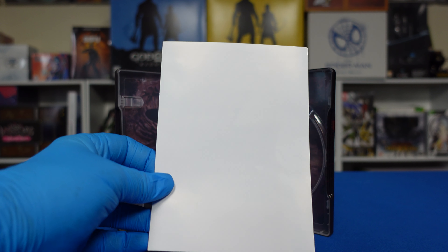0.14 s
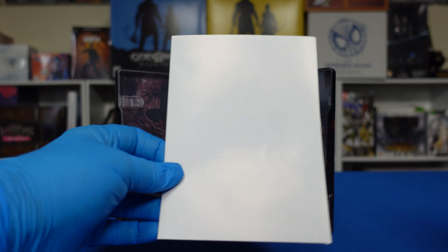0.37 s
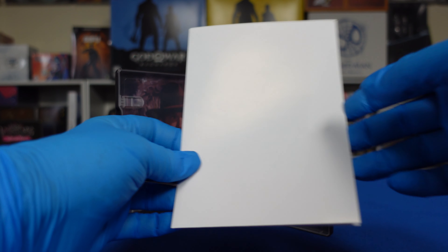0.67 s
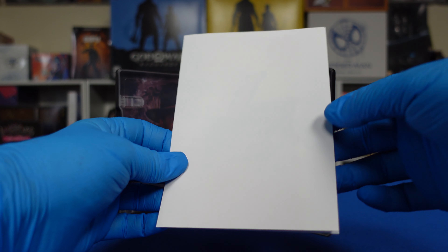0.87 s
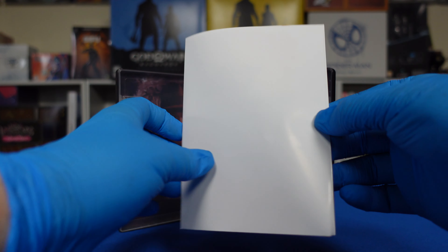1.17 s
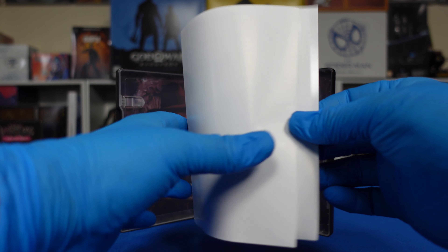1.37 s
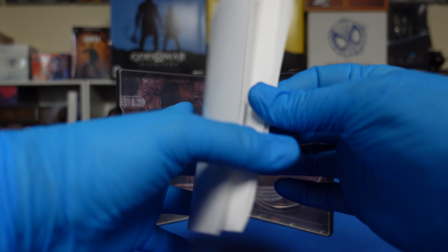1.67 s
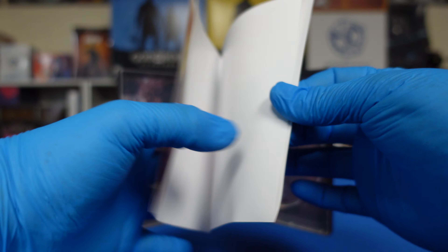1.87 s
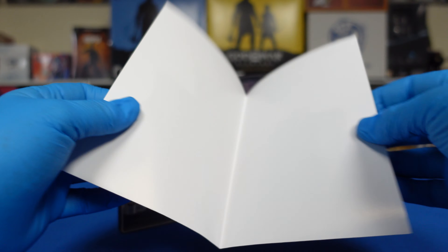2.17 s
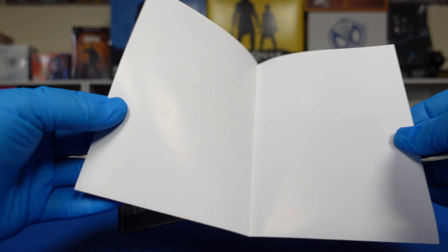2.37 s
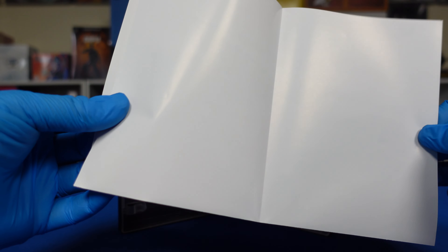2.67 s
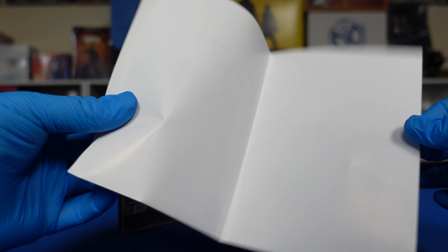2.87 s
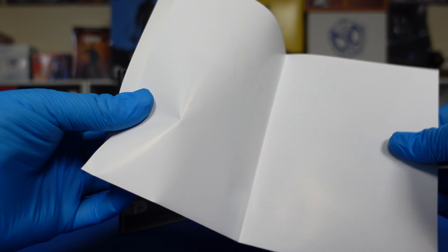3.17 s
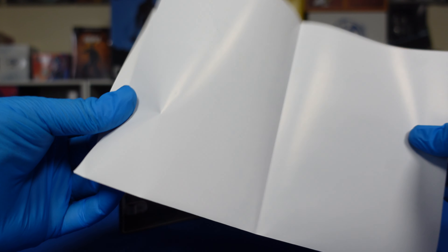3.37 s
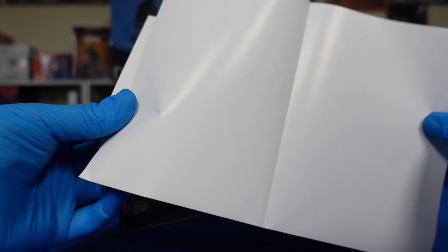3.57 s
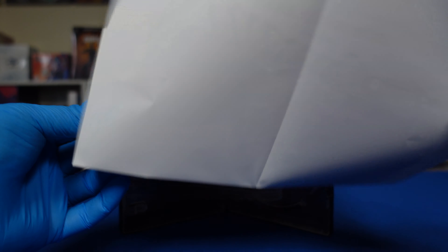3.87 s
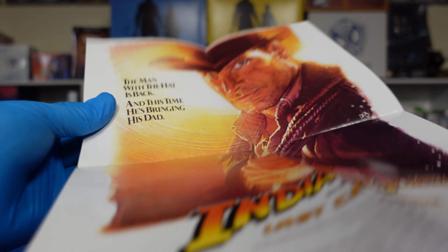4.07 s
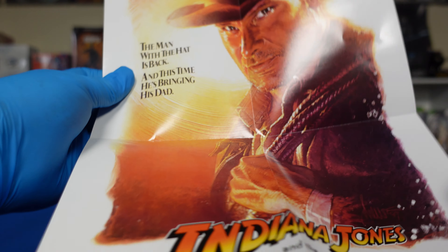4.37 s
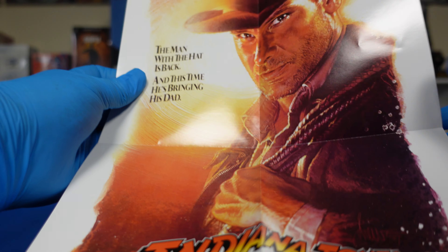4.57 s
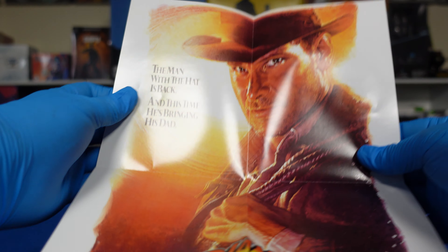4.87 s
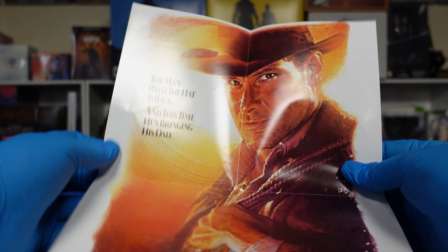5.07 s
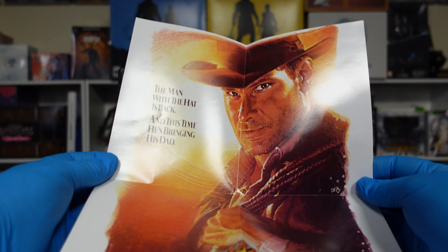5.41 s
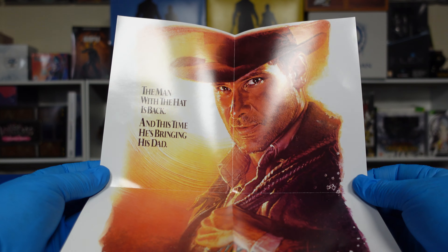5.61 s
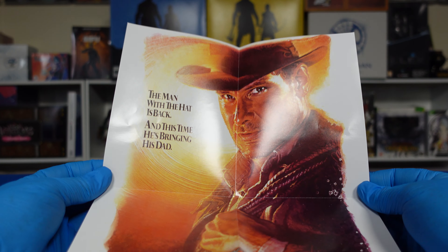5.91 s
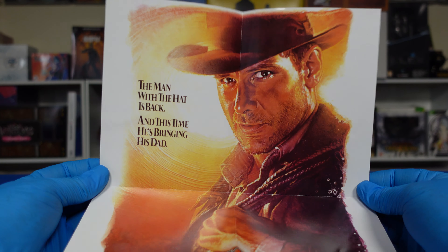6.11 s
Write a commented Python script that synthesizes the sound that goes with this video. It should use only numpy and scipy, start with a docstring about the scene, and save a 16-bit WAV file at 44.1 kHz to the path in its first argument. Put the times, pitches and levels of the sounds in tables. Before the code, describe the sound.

Close to the microphone in a small quiet room, gloved fingers slide softly over a folded glossy sheet. Short rasps, squeaks and crisp ticks follow as it opens. A stuck fold stutters free, then rustling swells to a loud crackling rush with hard crease snaps. Panels buckle with brief hollow pops, and lighter strokes and ticks finish over faint steady room noise.

```python
"""Gloved hands unfold a glossy paper poster close to a microphone in a small, quiet room.
It starts with faint sliding (grit and hiss driving the sheet) and a thin rising whistle (sine harmonics).
Short rasps and squeaks follow (stick-slip noise and tones), then a stuck fold stutters loose in slip runs.
Creases tick hard (chirped pulses) as the sliding peaks, then panels buckle with hollow pops (short rings).
Softer strokes, ticks and pops close the scene; steady room noise lies under all of it."""
import sys
import numpy as np
from scipy import signal
from scipy.fft import rfft, irfft, next_fast_len
from scipy.io import wavfile
from scipy.ndimage import uniform_filter1d, map_coordinates

SR = 44100
rng = np.random.default_rng(int(sys.argv[2]) if len(sys.argv) > 2 else 0)


def store_pcm(level_fs):
    """Save levels as 16-bit WAV."""
    pcm = np.round(np.clip(level_fs, -1, 1) * 32767).astype(np.int16)
    wavfile.write(sys.argv[1], SR, np.atleast_2d(pcm).T)


N = 275524
TIME = np.arange(N) / SR


def amp(db):
    """Decibels to gain."""
    return 10 ** (np.asarray(db) / 20)


def unit(x):
    """Scales to rms 1."""
    return x / np.sqrt(np.mean(x ** 2) + 1e-20)


def read(points, hz):
    """Interpolates a spectrum on a log-frequency axis."""
    point_hz, value = np.transpose(points)
    return np.interp(np.log(hz + 1), np.log(point_hz + 1), value)


def curves(rows):
    """Interpolates each column of a table over time."""
    s, *columns = np.transpose(rows)
    return [np.interp(TIME, s, column) for column in columns]


def add(mix, s, sound):
    """Mixes a sound in at s seconds, or at 0 if s is negative."""
    part = mix[max(round(s * SR), 0):][:len(sound)]
    part += sound[:len(part)]


def high_pass(x, hz):
    """Second-order low cut at hz."""
    return signal.sosfilt(signal.butter(2, hz, "high", fs=SR, output="sos"), x)


def colour(x, gain):
    """Minimum-phase filter whose magnitude is gain(Hz)."""
    size = 4096
    log_gain = np.log(np.maximum(gain(abs(np.fft.fftfreq(size, 1 / SR))), 1e-5))
    spectrum = np.exp(np.conj(signal.hilbert(log_gain)))
    taps = np.fft.ifft(spectrum).real[:size // 2]
    return signal.oaconvolve(x, taps)[:len(x)]


def wander(size, hz):
    """Smooth noise of rms 1; its spectrum falls to 1/e at hz."""
    f = np.fft.rfftfreq(next_fast_len(size + 4096), 1 / SR)
    noise = rng.standard_normal(len(f)) + 1j * rng.standard_normal(len(f))
    return unit(irfft(noise * np.exp(-(f / hz) ** 2))[:size])


def snap(hz, cycles=0.54, sweep=1.654):
    """A tiny flexural pulse: short waves run faster through paper, so it chirps downwards."""
    turns = np.arange(400) * hz / SR
    age = turns / cycles
    phase = 0.7 * turns + sweep * (1 - np.exp(-age)) + rng.random()
    pulse = age * np.exp(-age) * np.sin(2 * np.pi * phase)
    return pulse / abs(pulse).max()


def grit(per_s, spread_db, count=12):
    """A hail of fibre snaps of many pitches and uneven size, whitened and evened in level."""
    size = amp(spread_db * np.minimum(rng.exponential(1, N), 3.8)) * (rng.random(N) < per_s / SR)
    signed_size = size * rng.choice([-1, 1], N)
    kind = rng.integers(0, count, N)
    shapes = [unit(snap(hz)) * np.sqrt(hz) for hz in np.geomspace(1200, 8000, count)]
    hail = np.zeros(N)
    for k, shape in enumerate(shapes):
        hail += signal.oaconvolve(signed_size * (kind == k), shape)[:N]
    mean_gain = np.sqrt(sum(abs(rfft(shape)) ** 2 for shape in shapes))
    gain_hz = np.linspace(0, SR / 2, len(mean_gain))
    hail = colour(hail, lambda f: mean_gain.max() / np.interp(f, gain_hz, mean_gain))
    return hail / np.sqrt(abs(uniform_filter1d(hail ** 2, size=1300)) + 1e-9)


# Colour of a snapping crease. Each row: frequency in Hz, gain in dB.
CREASE_COLOUR = [(100, -26.5), (400, -2), (900, -4), (2500, -2.5), (6000, 1), (8000, 1.5), (15000, 1.5)]


def crease_colour(x):
    """Filters snaps to the spectrum of a crease."""
    return colour(x, lambda f: amp(read(CREASE_COLOUR, f)))


# One leaf or finger slides over the paper. Each row: start in s, rise in s, fall in s, rustle in dB,
# panel flutter in dB over rustle, edge hiss in dB over rustle, share of crackle 0-1.
STROKES = [(0, 0.16, .02, -50, -0.5, 4.5, 0.14), (.675, 0.039, 0.0096, -44.5, 0.5, 6.5, 0.24),
           (.9, 0.0065, 0.089, -51, -0.5, 7.5, 0.6), (1.04, 0.22, 0.033, -47, -1.5, 6.5, 0.2),
           (1.125, .023, 0.02, -40.5, -5, 11.5, 0.9), (1.183, 0.24, 0.073, -29, -14.5, 5, 0.54),
           (1.5, 0.025, .11, -34.5, -3, -4, 0.73), (1.618, 0.13, 0.018, -29.5, -14.5, -2.5, 0.6),
           (1.858, 0.056, 0.029, -35, -22, 2.5, 0.43), (1.95, 0.071, 0.078, -35, 0, 0.5, 0.65),
           (2.1, 0.042, 0.15, -39.5, 0, -2, 0.26), (2.344, 0.13, 0.16, -27, 0, -4.5, 0.56),
           (2.5, .08, 0.19, -27.5, -7, -1, 0.8), (2.66, 0.19, 0.13, -28.5, -7, 4.5, .75),
           (3.159, 0.17, 0.046, -21.5, -4, -6, 0.96), (3.341, 0.082, 0.074, -25.5, -3.5, -0.5, 0.77),
           (3.479, 0.1, 0.29, -23.5, -7, -3.5, 0.68), (3.689, 0.039, 0.11, -17, -8, -8.5, 0.32),
           (3.859, 0.13, 0.06, -16.5, -7.5, -6.5, 0), (4.041, 0.097, 0.13, -25, -13, -7, 0),
           (4.233, 0.11, 0.086, -23, -5.5, -4.5, 0.64), (4.48, 0.036, 0.15, -33, -5.5, -7.5, .98),
           (4.763, 0.043, 0.12, -32, 0.5, -3.5, 0.62), (4.949, .07, 0.13, -40, -3, 0.5, 0.17),
           (5.125, 0.075, 0.055, -32.5, -2, 0.5, 0.05), (5.282, 0.016, 0.12, -33.5, -3, -2.5, 0.12),
           (5.379, 0.066, 0.17, -36.5, 0, 2, 0.44), (5.55, 0.012, .06, -31.5, -6, 1.5, 0.53),
           (5.625, 0.029, 0.11, -37.5, 3.5, 0, 0.82), (5.746, 0.033, .05, -33, 2, -1, 0.63),
           (5.81, 0.055, 0.18, -35, 4.5, -3, 0.76), (6.001, 0.042, .07, -32.5, -9, -4, 0.25),
           (6.16, 0.064, 0.096, -31, -7, -5, 0.33)]
# The held sheet never quite rests. Levels of panel flutter, rustle and edge hiss in dB.
HELD_DB = (-69, -67.5, -73)


def strokes(swell_db=9.5, arch_power=1.23, touch_share=0.071, release_s=0.028, held_crackle=1):
    """Arched swells of contact; returns gains of flutter, rustle and hiss, and the share of crackle."""
    power = amp(HELD_DB)[:, None] ** 2 * np.ones(N)
    crackling = held_crackle * power[1]
    for start, rise, fall, db, flutter_db, hiss_db, share in STROKES:
        age = TIME - start
        from_peak = np.interp(age, [0, rise, rise + fall], [1, 0, 1])
        touch = np.clip(age / (touch_share * rise), 0, 1)
        release = np.exp(-np.maximum(age - rise - fall, 0) / release_s)
        rustle = (touch * release * amp(db - swell_db * from_peak ** arch_power)) ** 2
        power += amp([flutter_db, 0, hiss_db])[:, None] ** 2 * rustle
        crackling += share * rustle
    return np.sqrt(power), np.clip(crackling / power[1], 0, 1)


# Colour of the sliding paper. Each row: frequency in Hz, gain in dB.
PAPER_COLOUR = [(24, -103), (40, -52), (243, -20.5), (297, -15), (372, -14.5), (516, -4), (556, -2),
                (697, 0), (1240, -6), (1720, -7), (2910, -5), (5310, -12.5), (8130, -15), (14800, -25.5),
                (16000, -20.5)]


def sliding(flutter_hz=1100, hiss_hz=4500, judder_db=1.7, patchy_db=1):
    """Grit and hiss drive the sheet; its panels, its face and its edges each radiate their own range."""
    gains, share = strokes()
    crackle = crease_colour(grit(per_s=750, spread_db=5))
    drive = np.sqrt(share) * crackle + np.sqrt(1 - share) * rng.standard_normal(N)
    drive *= amp(judder_db * wander(N, hz=69.0))
    drive = colour(drive, lambda f: amp(read(PAPER_COLOUR, f)))
    size = next_fast_len(N)
    f, spectrum = np.fft.rfftfreq(size, 1 / SR), rfft(drive, size)
    below_flutter = 1 / (1 + (f / flutter_hz) ** 6)
    below_hiss = 1 / (1 + (f / hiss_hz) ** 6)
    ranges = below_flutter, below_hiss - below_flutter, 1 - below_hiss
    out = np.zeros(N)
    for weight, gain in zip(ranges, gains):
        band = unit(irfft(spectrum * weight, size)[:N])
        out += band * gain * amp(patchy_db * wander(N, hz=30.2))
    return out


# A stuck fold lets go in runs of evenly spaced slips. Each row: start in s, end in s, period in s,
# slip length in s without edges, level in dB, first Hz, last Hz, share of squeak 0-1.
STUTTERS = [(2.883, 2.99, .0237, 0.0163, -13, 2770, 1598, 0.37),
            (3.179, 3.268, 0.027, 0.0112, -17, 1882, 2246, 0.39)]


def stutters(sag=0.74):
    """Splits runs into slips with stepped first pitches; each slip ends at sag times its own."""
    rows = []
    for start, end, period, length, db, first_hz, last_hz, share in STUTTERS:
        times = np.arange(start, end, period)
        pitches = np.geomspace(first_hz, last_hz, len(times))
        rows += [(s, length, db, hz, hz * sag, share) for s, hz in zip(times, pitches)]
    return rows


# Colour of the rasp at a mean slip rate of 2500 Hz. Each row: frequency in Hz, gain in dB.
RASP_COLOUR = [(80, -61), (300, -47), (600, 2), (1200, 0.5), (2500, 8), (5000, 5), (9000, -3.5),
               (12000, -7), (16000, -12)]


def rasp(drive, mean_hz):
    """Irregular stick-slip noise; faster slips rasp brighter."""
    quickness = (mean_hz / 2500) ** 0.46
    return unit(colour(drive, lambda f: amp(read(RASP_COLOUR, f / quickness))))


# The glossy faces stick and slip. Each row: start in s, length in s without edges, level in dB,
# first Hz, last Hz, share of squeak 0-1 (the rest is rasp).
SLIPS = [(0, 0.03, -38.5, 2485, 2800, 0.63), (.029, .09, -44.5, 3250, 3380, 0.66),
         (.121, .017, -28, 3456, 3586, 0.07), (.675, .013, -31.5, 6150, 5680, 0),
         (1.205, 0.027, -21.5, 4200, 4670, 0.63), (1.249, 0.013, -15.5, 6210, 3010, 0.7),
         (1.281, 0.014, -18, 2400, 6950, 0.86), (1.291, 0.047, -18, 6880, 10200, 0.8),
         (1.345, 0.013, -14.5, 10200, 7960, 0.51), (1.391, 0.01, -18, 3550, 4330, 0.16),
         (1.631, 0.0058, -25, 6000, 6000, 0.1), (1.742, .017, -17, 3910, 5120, .08),
         (1.929, 0.012, -19, 4110, 2110, 0.24), (2.291, 0.05, -30, 851, 704, 0.73),
         (2.622, .04, -17.5, 5280, 8070, 0.84), (2.667, 0.016, -16.5, 2404, 2040, 0.2),
         (2.692, .045, -16, 5190, 3530, 0.52), (2.736, 0.06, -14.5, 3000, 2374, .44),
         (2.791, .085, -12, 2507, 2565, 0.6), (3.369, 0.0039, -12.5, 2460, 1980, 0.86),
         (3.495, .052, -20.5, 8220, 6900, 0.63), (3.69, 0.016, -19, 4680, 2950, 0.44),
         (3.882, .007, -11.5, 5300, 4440, 0.08), (3.888, .013, -13.5, 3070, 2220, 0.5),
         (4.06, 0.057, -22.5, 5080, 4590, 0.48), (4.344, 0.016, -13.5, 4456, 3560, 0.2)]


def slips(jitter=0.2786, jitter_hz=900, overtone_db=-11, edge_s=.003, shudder_db=0.5, swell_db=3):
    """The faces catch and let go at an audible rate: a squeak when regular, a rasp when not."""
    out = np.zeros(N)
    drive = unit(grit(per_s=5700, spread_db=2.5) + 0.68 * rng.standard_normal(N))
    for start, length, db, first_hz, last_hz, share in list(SLIPS) + stutters():
        size = round((length + edge_s) * SR)
        hz = np.geomspace(first_hz, last_hz, size)
        hz *= 1 + jitter * (1 - share) * wander(size, hz=jitter_hz)
        phase = 2 * np.pi * np.cumsum(hz) / SR
        squeak = np.zeros(size)
        for k in range(3):
            below_nyquist = (k + 1) * hz < SR / 2
            squeak += amp(overtone_db * k) * np.sin((k + 1) * phase) * below_nyquist
        noise = rasp(drive[round(start * SR):][:size], np.sqrt(first_hz * last_hz))
        t = np.arange(size) / SR
        grip = np.clip(np.minimum(t, t[-1] - t) / edge_s, 0, 1)
        grip *= amp(shudder_db * wander(size, hz=150))
        grip *= amp(swell_db * (t / t[-1] - .5))  # tension builds until the faces let go
        slip = np.sqrt(share) * unit(squeak) + np.sqrt(1 - share) * noise
        add(out, start - edge_s / 2, amp(db) * grip * slip)
    return high_pass(out, hz=365)


# Crease ticks. Each row: time in s, pulse level in dB before colouring, nominal chirp pitch in Hz.
TICKS = [(0.125, -8, 4340), (1.213, -6.5, 4700), (1.374, -7, 2770), (1.473, -5.5, 3030),
         (1.956, -7.5, 5530), (1.994, -12.5, 5740), (2.47, -5.5, 2940), (2.487, -7.5, 2900),
         (3.049, -17.5, 3855), (3.084, -19, 2390), (3.101, -14, 2360), (3.307, -3.5, 2530),
         (3.402, -8, 3455), (3.414, -8.5, 2500), (3.455, -5.5, 2500), (3.461, -2, 3280),
         (3.545, -0.5, 2880), (3.571, 1.5, 3360), (3.592, -10, 3490), (3.62, -13, 3360), (3.648, -2, 3300),
         (4.301, -7, 2030), (4.428, -6, 2300), (4.451, -17, 2090), (4.483, -11.5, 2300), (4.501, -12, 2660),
         (4.565, -16, 2880), (4.578, -19, 2860), (4.623, -17, 2060), (4.741, -17, 3900),
         (5.369, -12.5, 5590), (5.403, -15, 5620), (5.756, -25, 2480), (5.772, -17, 5670),
         (5.853, -18, 3240), (5.967, -15.5, 5600)]


def ticks(fizz_db=-21, fizz_decay_s=.0012):
    """Single creases snap, each with a brief fizz of fibres."""
    out, t = np.zeros(N), np.arange(SR // 50) / SR
    fizz = np.exp(-t / fizz_decay_s)
    for s, db, hz in TICKS:
        add(out, s, amp(db) * snap(hz, cycles=0.53, sweep=0.44))
        add(out, s, amp(db + fizz_db) * fizz * rng.standard_normal(len(t)))
    return high_pass(crease_colour(out), hz=294)


# Reflections off the curling panels. Each row: nominal delay in s, gain before level correction.
PANELS = [(.00033, -.24), (.00071, .3), (.0016, -.26), (.0027, .2)]


def bending(x):
    """Panels reflect the sound; as they curl the paths change and hollow bands drift through it."""
    out = x.copy()
    for delay, gain in PANELS:
        path_s = delay * np.exp(.22 * wander(N, hz=2.5))
        out += gain * map_coordinates(x, [(TIME - path_s) * SR], order=3)
    return out / np.sqrt(1 + sum(gain ** 2 for _, gain in PANELS))


# Panels buckle through. Each row: time in s, ring level in dB before the low cut, starting pitch in Hz,
# ring time constant in s.
POPS = [(0.782, -30, 1330, 0.0013), (.846, -34.5, 1310, 0.0012), (.995, -28.5, 1060, 0.00079),
        (1.937, -18, 1330, 0.004), (2.105, -17, 1060, 0.00058), (2.67, -8.5, 1020, .0005),
        (3.101, -25.5, 1000, .001), (4.237, -14, 1180, .0014), (4.3728, -6.5, 1580, 0.0013),
        (4.3762, -3, 980, 0.00099), (4.6476, -1, 1910, 0.00081), (4.9816, -12.5, 1240, 0.00027),
        (5.185, -12.5, 1020, 0.0014), (5.654, -21, 1170, 0.0025), (5.9, -11.5, 1080, 0.00083)]


def pops(rise_s=0.000067, sag=0.047, shiver_db=-22, shiver_s=0.019):
    """A buckling panel rings briefly, sagging in pitch, and the sheet shivers after it."""
    out, t = np.zeros(N), np.arange(SR // 10) / SR
    for s, db, hz, ring_s in POPS:
        pitch_hz = hz * (1 - sag * (1 - np.exp(-t / (2 * ring_s))))
        phase = 2 * np.pi * np.cumsum(pitch_hz) / SR
        ring = (1 - np.exp(-t / rise_s)) * np.exp(-t / ring_s) * np.sin(phase)
        noise = rng.standard_normal(len(t))
        shiver = unit(colour(noise, lambda f: (f / hz) ** 2 / (1 + (f / hz) ** 5)))
        shiver *= amp(shiver_db) * np.exp(-t / shiver_s)
        add(out, s, amp(db) * (ring / abs(ring).max() + shiver))
    return high_pass(out, hz=406)


# A faint whistle. Each row: time in s, fundamental (itself silent) in Hz, level in dB.
WHISTLE = [(.25, 3040, -70), (.4, 3150, -67), (.48, 3050, -74), (.54, 3240, -63), (.615, 3600, -57),
           (.67, 3400, -61)]


def whistle(harmonics_db=(0, 0, -4)):
    """A thin tone of second to fourth harmonics that wavers and rises."""
    hz, db = curves(WHISTLE)
    phase = 2 * np.pi * np.cumsum(hz * (1 + .003 * wander(N, hz=300))) / SR
    sounding = (TIME > WHISTLE[0][0]) & (TIME < WHISTLE[-1][0])
    tone = sum(amp(h) * np.sin((k + 2) * phase) for k, h in enumerate(harmonics_db))
    return sounding * amp(db) * tone


# Echoes off the hands and the table. Each row: delay in s, gain.
ECHOES = [(.0031, 0.072), (.0067, 0.049), (0.0114, .11), (0.014, 0.04)]


def echoes(x):
    """Near surfaces return delayed, weaker copies."""
    out = np.zeros(N)
    for delay, gain in ECHOES:
        add(out, delay, gain * x)
    return out


# The room's decay. Each row: frequency in Hz, t60 in s.
ROOM = [(200, 0.19), (1500, 0.12), (5000, 0.17), (14000, 0.21)]


def room_tail(x, onset_s=.004):
    """Dense reflections as noise whose decay time depends on frequency."""
    hz, t, z = signal.stft(rng.standard_normal(SR // 3), SR, nperseg=256)
    decay = amp(-60 * t / read(ROOM, hz)[:, None])
    tail = signal.istft(z * decay * (t > onset_s), SR, nperseg=256)[1]
    return signal.oaconvolve(x, tail / np.linalg.norm(tail))[:N]


# Colour of the room's quiet background. Each row: frequency in Hz, gain in dB.
AIR_COLOUR = [(18, -64), (30, -45), (109, -16.5), (210, -10), (227, -10.5), (473, -2), (822, 1),
              (5590, -10), (6050, -5.5), (6550, -9.5), (11100, -10.5), (12600, -11), (16000, -14)]


def air(level_db=-51.5, width=0.56):
    """Steady room noise from a shared mid and a weaker side that differs in sign left and right."""
    noises = rng.standard_normal((2, N))
    mid, side = (unit(colour(noise, lambda f: amp(read(AIR_COLOUR, f)))) for noise in noises)
    return amp(level_db) * np.array([mid + width * side, mid - width * side])


def scene(rub_db=0.0, slip_db=0, tick_db=1, pop_db=0, room_db=-16, side_db=-20):
    """The paper straight ahead, with near echoes and a faint room around it."""
    rustle = bending(amp(rub_db) * sliding() + amp(slip_db) * slips() + amp(tick_db) * ticks())
    paper = rustle + amp(pop_db) * pops() + whistle()
    mid = paper + amp(room_db) * room_tail(paper) + echoes(paper)
    side = amp(side_db) * room_tail(paper, onset_s=0)
    side = colour(side, lambda f: 1 + 0.1 * f ** 2 / (f ** 2 + 3000 ** 2))  # the treble spreads wider
    return np.array([mid + side, mid - side]) + air()


def record(dry, edge_hz=15950):
    """Clips peaks at 0.9 of full scale, then applies the low cut and the band limit."""
    clipped = high_pass(np.clip(dry, -.9, .9), hz=90)
    band_limit = signal.firwin(511, edge_hz, window=("kaiser", 9), fs=SR)
    return signal.oaconvolve(clipped, band_limit[None], "same")


dry = scene()
out = record(dry)
store_pcm(out)
```